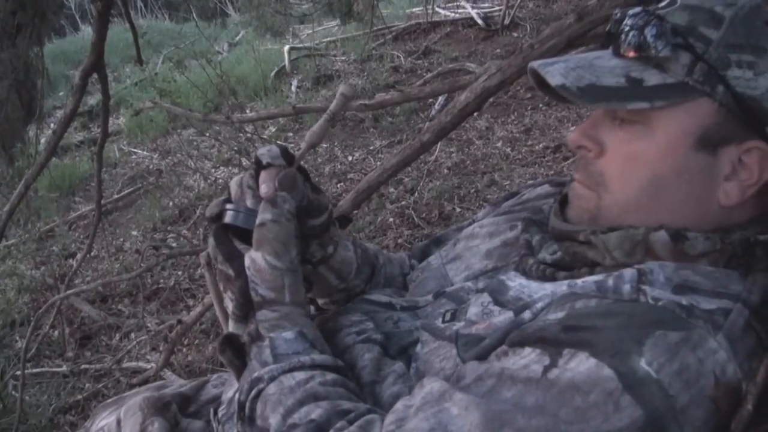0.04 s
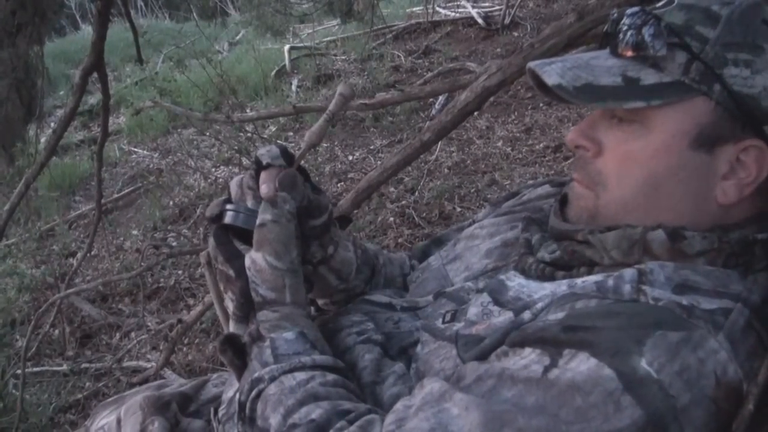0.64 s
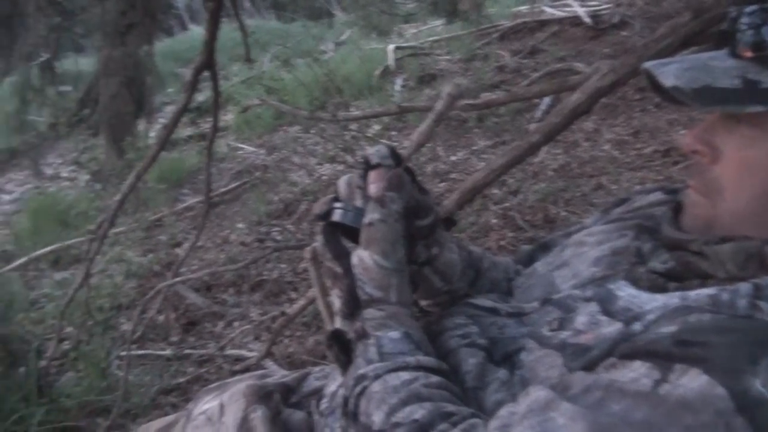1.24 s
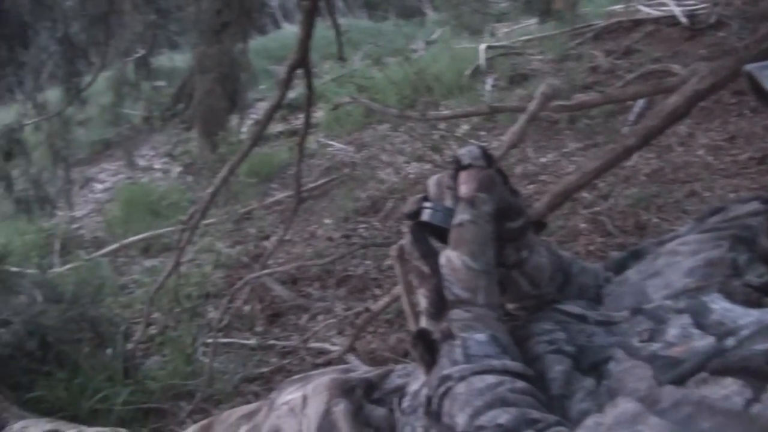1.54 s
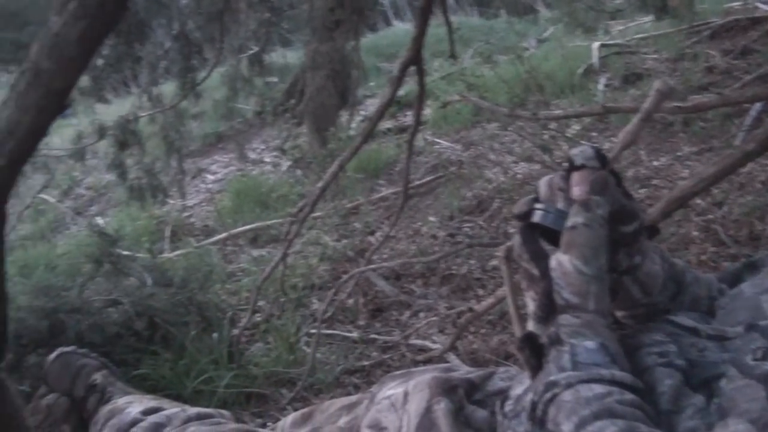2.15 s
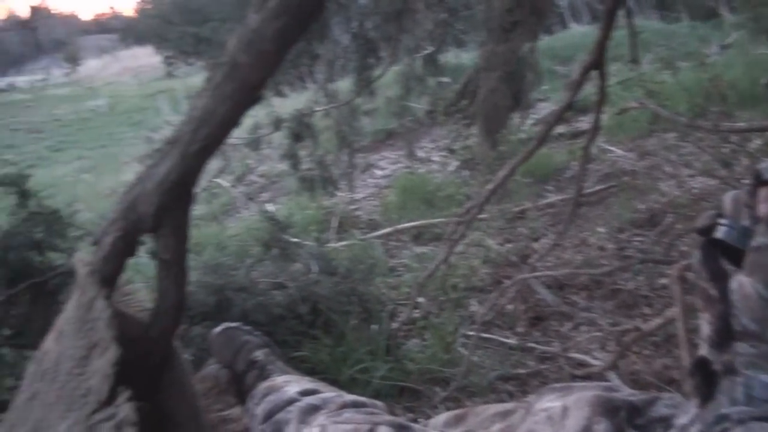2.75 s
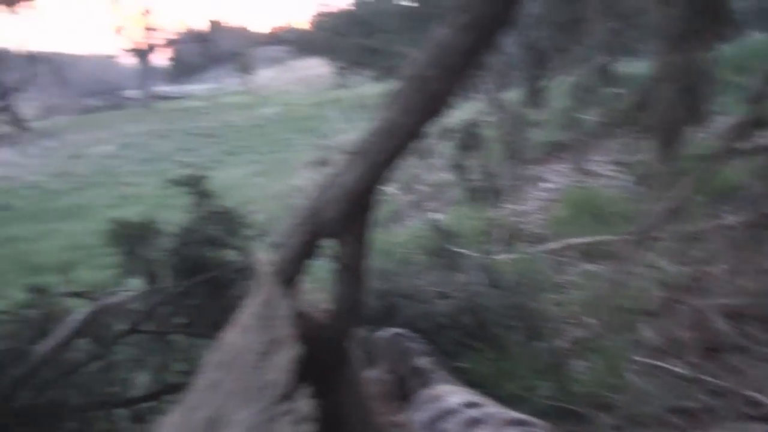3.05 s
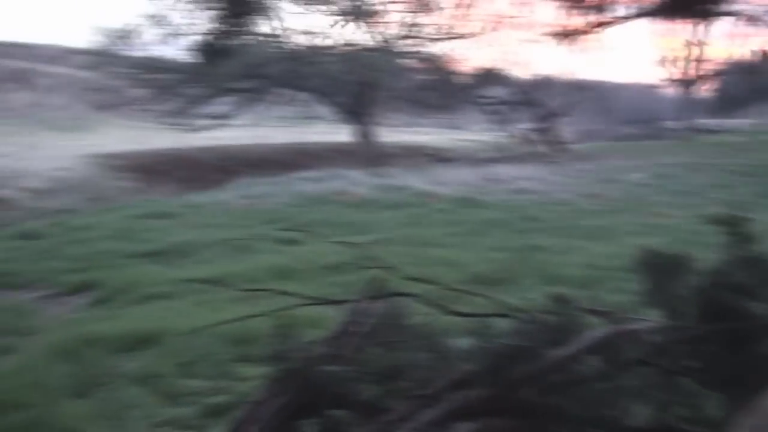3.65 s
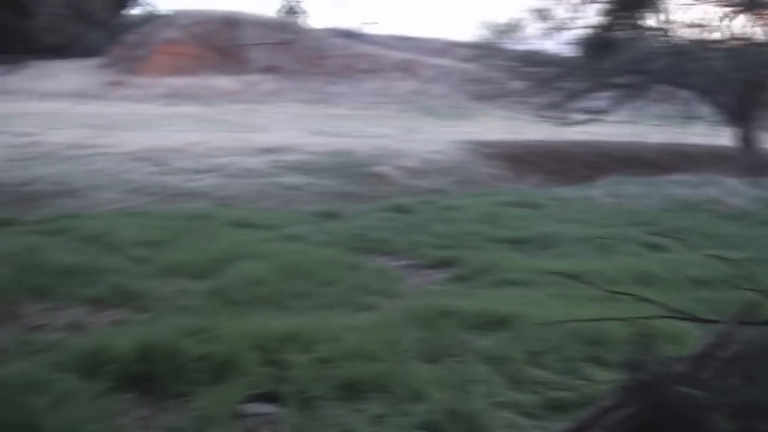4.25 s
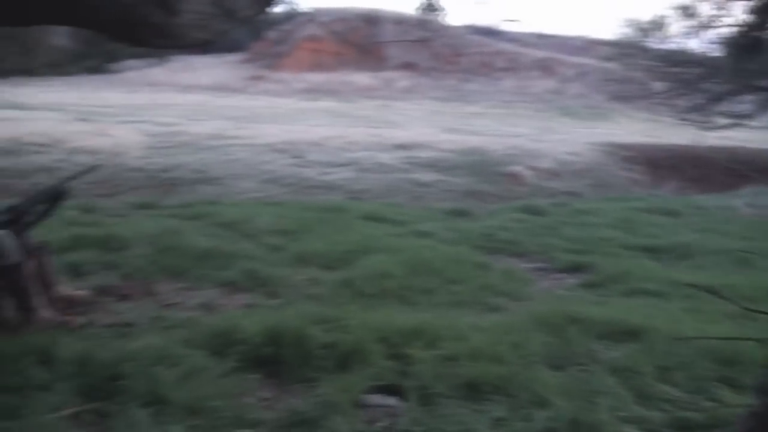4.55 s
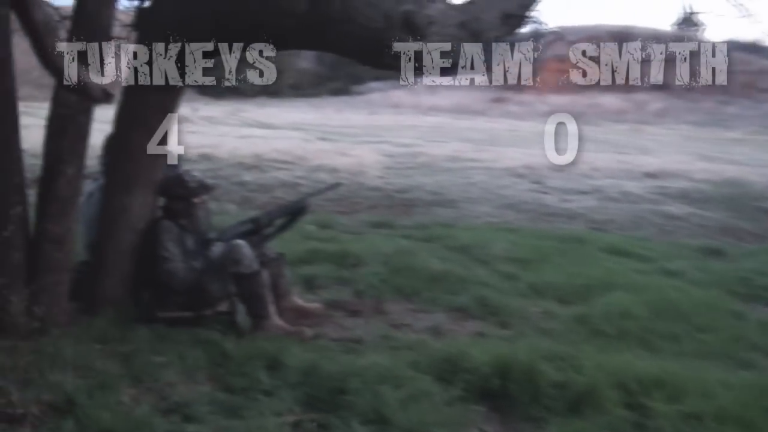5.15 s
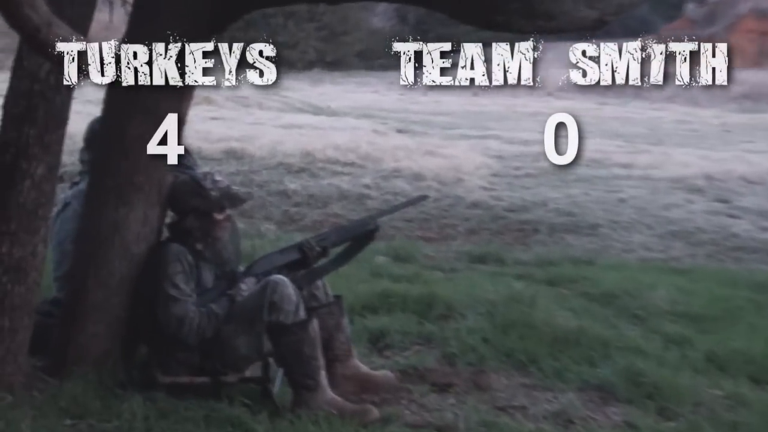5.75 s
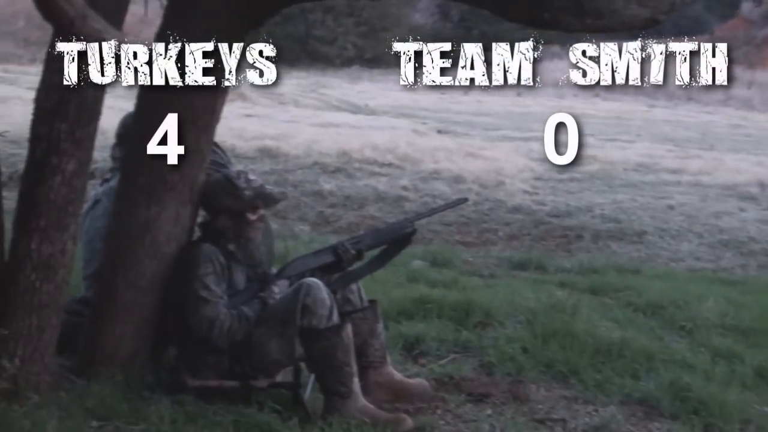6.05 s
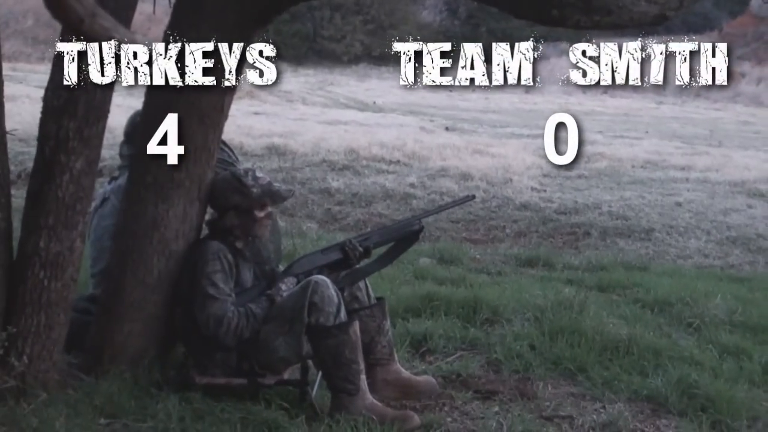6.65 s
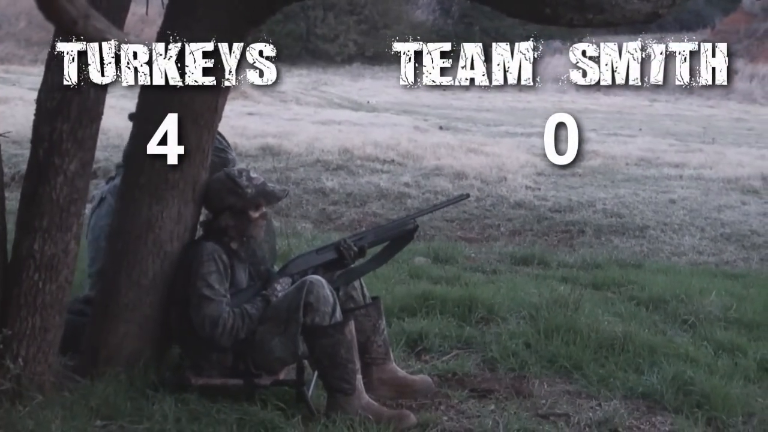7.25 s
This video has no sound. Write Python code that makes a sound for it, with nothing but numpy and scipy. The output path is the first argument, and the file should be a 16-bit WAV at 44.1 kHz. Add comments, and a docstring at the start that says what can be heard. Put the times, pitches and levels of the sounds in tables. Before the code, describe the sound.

At the edge of a field, a friction turkey call gives about twenty short, high, evenly spaced yelps. They begin gently, build to a brighter, sharper rasp and soften slightly before stopping. The sound drifts to the right and back as the microphone turns, with a faint echo from nearby trunks. Beneath it are quiet air hiss, gusty wind rumble, and a brief cloth rustle and dull microphone knock early on.

```python
"""A run of hen turkey yelps, played on a friction pot call by a hunter at the edge of a field.
In each stroke the striker sticks and slips on the plate: the pitch scoops down and up, and the pot
favours the second partial. The hand-held microphone swings away from the caller, so the yelps move
right and the trees answer more. Underneath lies a bed of wind rumble and hiss, with a sleeve rustle
and one soft knock on the microphone."""
import sys
import numpy as np
from scipy import signal
from scipy.fft import rfft, irfft, next_fast_len
from scipy.io import wavfile

SR = 44100
rng = np.random.default_rng(int(sys.argv[2]) if len(sys.argv) > 2 else 0)


def bounce(signal):
    """Save signal as a 16-bit WAV file at the path given by the first command-line argument."""
    frames = np.transpose(np.atleast_2d(signal))
    limited = np.clip(frames, -1, 1)
    pcm = np.round(limited * 32767).astype(np.int16)
    wavfile.write(sys.argv[1], SR, pcm)


N = 321489
TIME = np.arange(N) / SR

# how alike left and right are in every noise layer: (f/Hz, likeness/0-1)
STEREO_LIKENESS = [(50, .93), (90, .9), (160, .45), (330, .7), (630, .65), (1200, .42), (2500, .33),
                   (3800, .5), (6000, .84), (12000, .87)]
# tone of still air and microphone hiss: (f/Hz, relative level/dB)
HISS_COLOUR = [(210, -34), (350, -4), (537, -3.5), (671, -5.5), (1090, -4), (1270, -4.5), (1380, -5.5),
               (1970, -8.5), (2220, -10), (4870, -13), (12000, -16.5), (15600, -46.5), (22000, -120)]
# wind and handling swell as the microphone swings: (t/s, level/dB)
WIND_SWELL = [(0, -60), (.9, -58.5), (1.4, -49.5), (2.1, -55), (3.1, -48), (3.9, -45), (4.7, -49.5),
              (5.5, -47), (6.3, -52.5), (7.29, -57.5)]
# single gusts on the microphone: (t/s, peak level/dB, half width/s)
GUSTS = [(.14, -46.5, 0.064), (1.2, -43.5, 0.076), (3.14, -40, 0.045), (3.681, -36.5, 0.068),
         (3.95, -33, 0.057), (4.5, -45, 0.039), (4.9, -40, .03)]
# the wind's deep rumble: (f/Hz, relative level/dB)
RUMBLE_COLOUR = [(8.8, -34), (15, -1.5), (32, 2.5), (49, 5), (61, 4.5), (80, -37.5), (90, -5.5), (120, -36),
                 (200, -120)]
# the buffeting above it: (f/Hz, relative level/dB)
BUFFET_COLOUR = [(50, -11), (90, 0.5), (160, 2), (250, -4.5), (400, -13.5), (700, -12.5), (1400, -24.5)]
# sleeve rustle: (t/s, level/dB)
SLEEVE_LEVEL = [(0, -69), (1.0, -71), (1.2, -56), (1.4, -47), (1.6, -65), (1.9, -68), (7.29, -68)]
# its muffled tone: (f/Hz, relative level/dB)
SLEEVE_COLOUR = [(120, -2.5), (280, 0), (500, -12.5), (1200, -18.5), (3000, -26), (8000, -93)]
# knock on the microphone's body: (t/s, level/dB)
KNOCKS = [(1.965, -38.5)]
# its dull thud: (f/Hz, relative level/dB)
KNOCK_COLOUR = [(50, -5), (100, 0), (150, 5), (220, -6), (500, -22), (1200, -46)]

# how far the microphone points away from the caller: (t/s, turn/0-1)
MIC_TURN = [(0, 0), (3.25, 0.11), (3.56, 0.13), (3.88, 0.36), (4.19, 0.83), (4.8, 0.95), (5.7, 1),
            (6.6, 0.76)]
# where the call sits in the stereo image: (t/s, left minus right/dB)
CALL_PAN = [(.4, 1.5), (1.7, -1), (2.95, -4.5), (3.3, -9.5), (3.85, -17), (4.2, -12.5), (4.8, -3.5),
            (5.1, 2.5), (6.6, 2)]
# how far the left side trails when fully turned: (f/Hz, phase/rad)
LEFT_LAG = [(750, 1.35), (1500, 2.85), (2250, 1.87), (3000, 2.04), (3700, 2.11), (4500, 1.5), (6000, 0.62)]
# slaps off near trunks, when facing the caller: (delay/s, left level/dB, right level/dB)
TRUNK_ECHOES = [(.016, -20, -25), (.024, -23, -28)]

# one stroke per yelp: (t/s, length/s, lowest f/Hz, sag down to it/Hz, fundamental level/dB,
# second partial level/dB, overtone level/dB, swell of the last two across the stroke/dB)
YELPS = [(0.365, 0.11, 692, 71, -56.5, -30, -53, -4), (0.681, 0.089, 699, 76, -51, -29.5, -48.5, 6),
         (1.002, 0.12, 701, 81, -51, -27, -43, 4), (1.316, 0.11, 697, 127, -48, -23, -40, 4.5),
         (1.633, 0.1, 724.7, 86, -43, -18, -34.5, 10.5), (1.963, .11, 706, 96, -42, -15.5, -29.5, -1),
         (2.276, 0.09, 722, 95, -40.5, -15.5, -28, 6.5), (2.593, .104, 719.5, 68, -41.5, -16, -29, -3.5),
         (2.896, 0.1, 733.5, 94, -40.5, -15.5, -26.5, 13.5), (3.217, 0.1, 722, 99, -41, -16, -24.5, 0),
         (3.513, 0.1, 725.7, 83, -40.5, -17, -26, 2.5), (3.832, .1, 728.6, 58, -42, -17, -25.5, 0.5),
         (4.14, .1, 722.3, 47, -41, -17.5, -23.5, -2.5),
         (4.437, 0.11, 728.7, 16.5, -41.5, -19, -25.5, -2.5), (4.743, .1, 737.8, 20, -40.5, -19.5, -27, -1),
         (5.042, .1, 732, 10.5, -41.5, -21, -27, -3.5), (5.342, 0.11, 739.4, 11, -42, -21, -27.5, -2.5),
         (5.647, .1, 728.5, 18, -42, -21.5, -27, -2), (5.946, 0.11, 724.4, 14, -45, -23, -28, 4),
         (6.246, .1, 728.5, 9.9, -46.5, -23, -28.5, 3.5),
         (6.529, 0.11, 738.7, 15, -47.5, -24.5, -31.5, -4.5)]
# the striker loses its grip in the light first strokes: (t/s, depth/dB, half width/s)
GRIP_SKIPS = [(0.417, 30.5, 0.012), (0.744, 24.5, 0.0056), (1.054, 12.5, 0.0064), (1.074, 26, 0.0029),
              (1.102, 7, 0.0084), (1.377, 17, 0.0052), (1.401, 24, 0.0024), (2.033, 13.5, 0.013),
              (2.055, 20.5, 0.0059)]
# the hand goes from a gentle drag to a brisk oval: (t/s, briskness/0-1)
BRISKNESS = [(0, 0.12), (1.7, 0.09), (2.3, 0.18), (3.25, 0.13), (3.55, 0.51), (3.9, 0.6), (4.4, 0.98),
             (6.6, 1)]
# a loose hold on the striker adds rasp and flutter: (t/s, looseness with 1 = firm)
LOOSENESS = [(0, 0.8), (1.45, 2.07), (1.7, 0.81), (2.0, 1.44), (2.3, 1.08), (7.29, .8)]
# partials 4 and up, against the overtone level: (level/dB)
OVERTONES_DB = [-1, -12, -21, -30, -31, -41.5, -39.5, -45.5]
# the call's colour shifts along the run: (t/s, third partial gain/dB, highest partials gain/dB)
CALL_COLOUR = [(1.4, 2.5, -2), (2.3, 0, 2), (3.2, 1, 3), (3.8, 0, -2), (4.2, 2.5, -1.5), (4.7, 2, 3),
               (5.1, -1.5, 3), (5.7, -2, 4), (6.6, 0.5, 6)]
# the striker's scrape, coloured by the pot: (f/Hz, relative level/dB)
SCRAPE_COLOUR = [(400, -42), (650, -53), (850, 11), (1120, 18), (1750, -19), (2100, -5), (2750, 14),
                 (3900, -3.5), (6000, -2), (11000, -51)]
# grit under a firmly pressed striker: (f/Hz, relative level/dB)
GRIT_COLOUR = [(1500, -26), (2200, 1), (2700, 10), (3900, 4.5), (5500, -13.5), (8000, -28.5), (11000, -22)]


def from_db(db):
    """Decibels to gain."""
    return 10 ** (np.asarray(db) / 20)


def rms_one(x):
    """Normalise to rms 1."""
    return x / np.sqrt(np.mean(x ** 2) + 1e-20)


def between(pair, share):
    """Blend from the first value of a pair to the second."""
    return pair[0] + (pair[1] - pair[0]) * share


def in_time(rows):
    """Each column of an automation curve at every sample."""
    times, *columns = np.transpose(rows)
    return [np.interp(TIME, times, column) for column in columns]


def at_hz(points, hz):
    """Read a curve on a log-frequency axis."""
    known_hz, values = np.transpose(points)
    return np.interp(np.log(hz + 1e-9), np.log(known_hz), values)


def wobble(rate_hz):
    """Random modulation of rms 1, up to the given rate."""
    lowpass = signal.butter(2, rate_hz, fs=SR / 10, output="sos")
    slow = signal.sosfilt(lowpass, rng.standard_normal(N // 10 + 2))
    return np.interp(np.arange(N) / 10, np.arange(len(slow)), rms_one(slow))


def stereo_noise(colour):
    """Coloured noise of rms 1, wider in some bands than in others."""
    size = next_fast_len(N, True)
    hz = np.fft.rfftfreq(size, 1 / SR)
    mid, side = rfft(rng.standard_normal((2, size)))
    alike = at_hz(STEREO_LIKENESS, hz)
    both = np.sqrt(1 + alike) * mid + np.sqrt(1 - alike) * side * [[1], [-1]]
    return rms_one(irfft(both * from_db(at_hz(colour, hz)), size)[:, :N])


def hiss(level_db=-55):
    """A steady bed of still air and microphone hiss."""
    return from_db(level_db) * stereo_noise(HISS_COLOUR)


def wind(flutter_db=1.0, flutter_hz=6.2, buffet_offset_db=-23, buffet_follows=0.61):
    """Wind on the microphone: a gusty rumble, and buffeting that follows part of its swell."""
    swell_db, = in_time(WIND_SWELL)
    gusts = sum(from_db(db) * np.exp(-((TIME - s) / width) ** 2) for s, db, width in GUSTS)
    rumble = np.hypot(from_db(swell_db + flutter_db * wobble(flutter_hz)), gusts)
    buffet = from_db(buffet_offset_db + buffet_follows * swell_db)
    return rumble * stereo_noise(RUMBLE_COLOUR) + buffet * stereo_noise(BUFFET_COLOUR)


def sleeve():
    """Cloth rustles in one brief, muffled swell."""
    return from_db(in_time(SLEEVE_LEVEL)[0]) * stereo_noise(SLEEVE_COLOUR)


def knock(attack_s=0.0063):
    """A bump on the microphone's body: a short thud of low noise."""
    gain = 0
    for s, db in KNOCKS:
        age = np.maximum(TIME - s, 0) / attack_s
        gain = gain + from_db(db) * age * np.exp(1 - age)
    return gain * stereo_noise(KNOCK_COLOUR)


def trees(send, turn, t60_s=0.99, build_s=0.0097, tail_db=-32.5, tail_hz=2400, trunks_hz=3800):
    """Slaps off near trunks and a thin, dull tail from the wood; both rise as the microphone turns."""
    dull, bounced = (signal.sosfilt(signal.butter(2, hz, fs=SR, output="sos"), send)
                     for hz in (tail_hz, trunks_hz))
    t = np.arange(SR) / SR
    tail = rng.standard_normal((2, SR)) * from_db(-60 * t / t60_s) * (1 - np.exp(-t / build_s))
    tail /= np.sqrt(np.sum(tail ** 2) / 2)
    far = signal.fftconvolve(dull[None] * from_db(tail_db + 6 * turn), tail)[:, :N]
    near = sum(from_db([[left], [right]]) * np.interp(TIME - delay, TIME, bounced)
               for delay, left, right in TRUNK_ECHOES)
    return far + near * from_db(7 * turn)


def shudder(rate_hz=297, width_hz=14):
    """The striker's own shudder: noise in one narrow resonance, rms 1."""
    resonance = signal.iirpeak(rate_hz, rate_hz / width_hz, fs=SR)
    return rms_one(signal.lfilter(*resonance, rng.standard_normal(N)))


def striker_grip(looseness, stutter_db=1.9, stutter_hz=70):
    """Gain of the striker's contact: it ducks at each skip and stutters when the hold is loose."""
    skip_db = sum(depth * np.exp(-((TIME - s) / width) ** 2) for s, depth, width in GRIP_SKIPS)
    return from_db(stutter_db * np.maximum(looseness - 1, 0) * wobble(stutter_hz) - skip_db)


def strokes(catch_s=0.0062, flick_s=0.009, bite_s=0.021, lead_s=0.0062, linger_s=0.0029):
    """The hand's strokes: pitch, looseness, gains of fundamental (low), second partial (tone), edge."""
    rows = np.array(YELPS)
    middles = rows[:, 0] + rows[:, 1] / 2
    nearest = np.searchsorted((middles[1:] + middles[:-1]) / 2, TIME)
    start, length, lowest_hz, sag_hz, low_db, tone_db, edge_db, swell_db = rows[nearest].T
    age, remaining = TIME - start, start + length - TIME
    along = np.clip(age / length, 0, 1)
    brisk, = in_time(BRISKNESS)   # blends each (gentle, brisk) pair below

    # the pitch starts high until the striker catches, scoops, and flicks up as it lifts
    lowest_at = between((0.68, 0.53), brisk)
    catch = between((5, 171.7), brisk) * np.exp(-np.maximum(age, 0) / catch_s)
    sag = sag_hz * np.maximum(1 - along / lowest_at, 0) ** 1.5
    climb = between((35.03, 62.25), brisk) * np.maximum((along - lowest_at) / (1 - lowest_at), 0) ** 1.8
    flick = between((1, 173), brisk) * np.exp(-(np.maximum(remaining, 0) / flick_s) ** 2)
    hz = lowest_hz + catch + sag + climb + flick

    def envelope(db, attack_s, release_s, arch_db=0, late_s=0):
        """Attack, a hold that droops by arch_db at both ends, and release."""
        rise = np.clip((age + lead_s - late_s) / attack_s, 0, 1)
        fall = np.clip((remaining + linger_s) / release_s, 0, 1)
        hold = from_db(db - arch_db * np.abs(2 * along - 1) ** 1.75)
        return hold * np.sin(np.pi / 2 * rise * fall) ** 2

    lean_db = swell_db * (along - 0.5)
    low = envelope(low_db, attack_s=0.013, release_s=0.013)
    tone = envelope(tone_db + lean_db, attack_s=0.021, release_s=0.014,
                    arch_db=between((18, 5.5), brisk))
    # the overtones that give the edge need a firm grip, so they come last and go first
    edge = envelope(edge_db + lean_db, attack_s=0.02, release_s=0.028,
                    arch_db=between((24.5, 5.5), brisk), late_s=0.0053)
    looseness, = in_time(LOOSENESS)
    grip = striker_grip(looseness)
    bite = 1 + 1.34 * np.exp(-np.maximum(age, 0) / bite_s)   # looser while the striker bites in
    return hz, looseness * bite, low * np.sqrt(grip), tone * grip, edge * grip


def pot_call(turn, jitter=0.00313, waver=0.00209, rasp=0.018, flutter_db=0.7027, fray=0.015,
             uneven_db=2.5, slide_db=24, third_db=-5, scrape_db=-9, grit_db=-20):
    """Stick-slip partials with scrape and grit; returns the stereo call and a mono send to the trees."""
    hz, loose, low, tone, edge = strokes()
    third_shift_db, highest_db = in_time(CALL_COLOUR)
    pan_db, = in_time(CALL_PAN)
    # the microphone's body shades each band differently: (facing, turned away)
    low_pan = pan_db + between((0, -3.5), turn)
    tone_pan = pan_db + between((3, -10), turn)
    edge_pan = pan_db + between((-0.5, 2), turn)
    # the shudder puts rasping side tones around every partial
    slips = loose * (shudder() + 0.13 * wobble(600))
    # at the high ends of the scoop the striker barely holds:
    # the cavity lifts the fundamental and the rest breaks up
    sliding = np.clip((hz - 790) / 100, 0, 1.5)
    cavity = from_db(at_hz([(700, -0.5), (750, -1.5), (880, 10.5), (1000, 3.5)], hz))
    held = from_db(-slide_db * sliding)
    detune = (loose + 2 * sliding) * (jitter * wobble(329) + waver * wobble(71))
    phase = 2 * np.pi * np.cumsum(hz * (1 + detune)) / SR

    third = from_db(third_db + third_shift_db) * np.sqrt(low * edge)
    partials = [(low * cavity, low_pan),
                (tone * np.sqrt(held), tone_pan),
                (third * np.sqrt(held), (low_pan + edge_pan) / 2)]
    for k, level_db in enumerate(OVERTONES_DB):
        bright_db = highest_db * min(k, 3) / 3
        gain = edge * held ** (0.5 + k / 2) * from_db(level_db + bright_db)
        partials.append((gain, edge_pan / (1 + 0.3 * k)))

    direct, send = np.zeros((2, N)), np.zeros(N)
    centre_hz = np.average(hz, weights=tone)
    for k, (gain, balance_db) in enumerate(partials, 1):
        flutter = from_db(flutter_db * loose * k / 2 * wobble(79))
        gain = np.sqrt(2) * gain * (1 + rasp * slips) * flutter
        if k > 4:   # the upper partials vary as the striker crosses the plate
            gain *= from_db(uneven_db * wobble(14))
        # no two slips have the same shape, which frays the highest partials most
        angle = k * phase + fray * (k / 4) ** 2 * wobble(230)
        lag = turn * at_hz(LEFT_LAG, k * centre_hz)
        left_share = 1 / (1 + from_db(-2 * balance_db))
        wave = gain * np.sin(angle)
        direct += np.sqrt([2 * left_share, 2 * (1 - left_share)]) * [gain * np.sin(angle - lag), wave]
        send += wave
    scrape = from_db(scrape_db) * np.sqrt(loose + sliding) * low * stereo_noise(SCRAPE_COLOUR)
    scrape *= from_db([low_pan / 2, -low_pan / 2])
    grit = from_db(grit_db) * edge * stereo_noise(GRIT_COLOUR)
    return direct + scrape + grit, send + 3 * scrape[0] + 2 * grit[0]


def scene():
    """The yelps up front, the trees behind, wind, handling and hiss below."""
    turn, = in_time(MIC_TURN)
    call, send = pot_call(turn)
    return call + trees(send, turn) + wind() + sleeve() + knock() + hiss()


def record(dry, cutoff_hz=12100):
    """A steep high cut on the whole mix."""
    return signal.sosfilt(signal.ellip(12, 0.2, 80, cutoff_hz, fs=SR, output="sos"), dry)


dry = scene()
out = record(dry)
bounce(out)
```